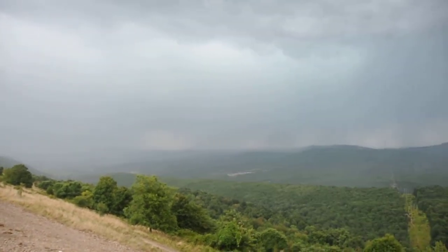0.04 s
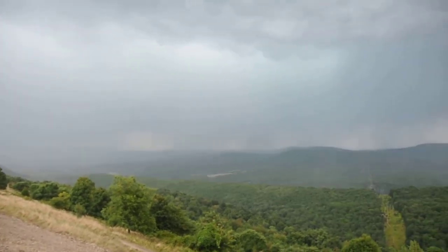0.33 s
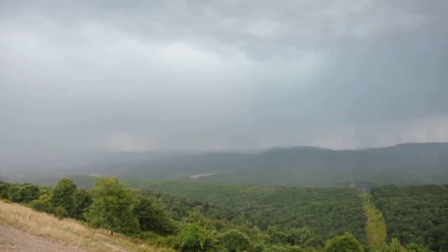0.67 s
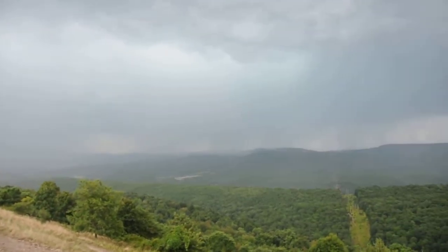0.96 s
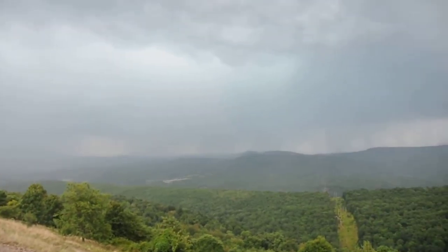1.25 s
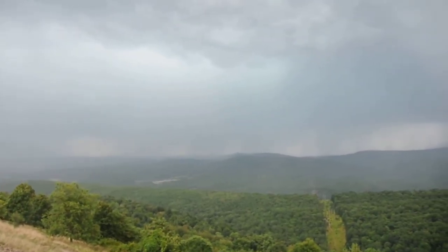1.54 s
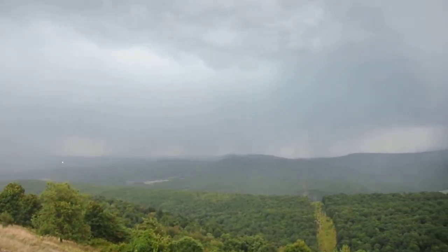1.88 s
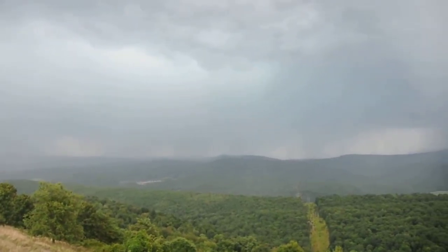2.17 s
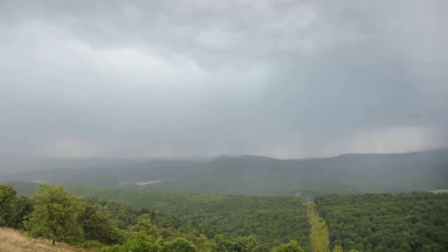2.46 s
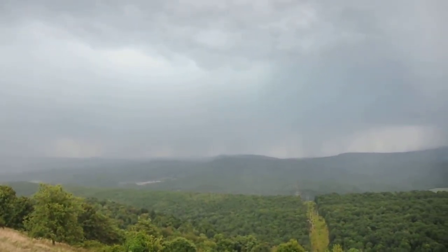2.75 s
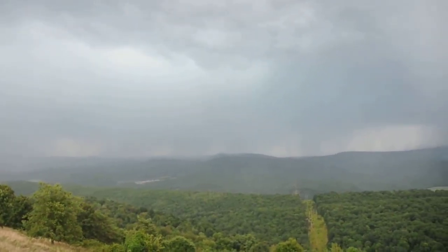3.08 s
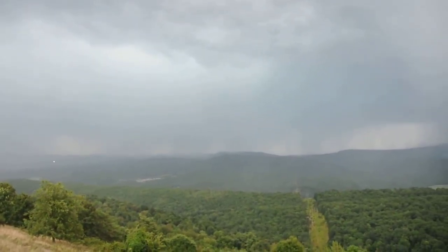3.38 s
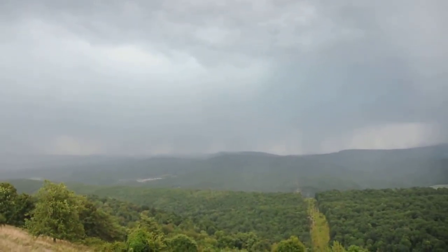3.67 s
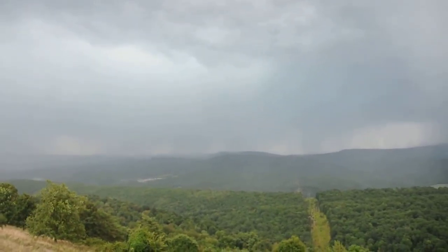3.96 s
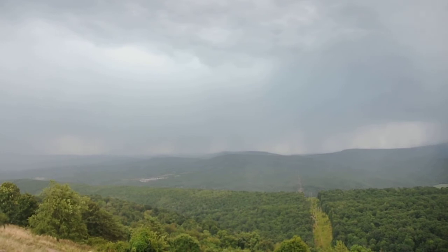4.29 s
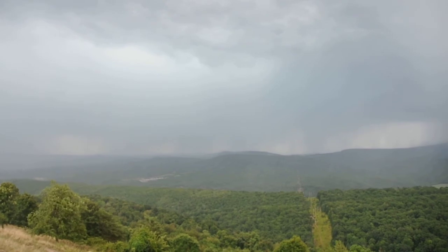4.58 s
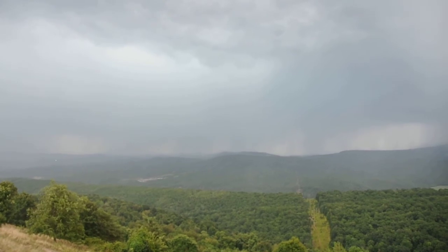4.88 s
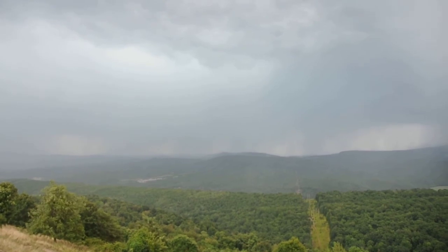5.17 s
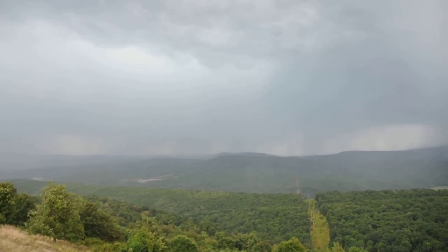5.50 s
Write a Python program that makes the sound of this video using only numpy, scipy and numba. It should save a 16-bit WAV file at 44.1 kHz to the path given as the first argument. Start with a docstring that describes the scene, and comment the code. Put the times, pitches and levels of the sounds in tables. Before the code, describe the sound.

Gusty wind rumbles and thumps against the microphone outdoors, with a faint hiss of trees and one small handling click.

```python
"""A hillside above a wooded valley, where storm wind buffets the microphone of a hand-held camera.
Turbulence rumbles at the port and single eddies thump it into overload; trees and dry grass hiss behind.
The hand ticks, rubs and clicks on the case, and the gain control ducks after the hardest blows."""
import sys
import numpy as np
from scipy import signal
from scipy.fft import rfft, irfft
from scipy.io import wavfile
from scipy.ndimage import uniform_filter1d
from numba import njit

SR = 44100
rng = np.random.default_rng(int(sys.argv[2]) if len(sys.argv) > 2 else 0)


def transcribe(u):
    """Save the signal u as a 16-bit wav file named by the first command-line argument.

    u: samples, shape (n,) or (channels, n), limited to [-1, 1]; the rate is SR.
    q: integer samples, one column per channel.
    """
    v = np.clip(np.atleast_2d(u).T, -1, 1)
    q = np.round(v * 32767).astype(np.int16)
    wavfile.write(sys.argv[1], SR, q)


N = 243873

# colour of skin rubbing on the case, and of the case's rattle: f/Hz, level/dB
SKIN_COLOUR = [(500, 1), (1200, -3.5), (2200, -0.5), (3000, -4.5), (4000, -12), (5200, -29)]


def undb(db):
    """Decibels to gain."""
    return 10 ** (np.asarray(db) / 20)


def unit(x):
    """Scale to rms 1."""
    return x / np.sqrt(np.mean(x ** 2))


def seconds():
    """Time of every sample."""
    return np.arange(N) / SR


def curves(table):
    """Automation lanes: each column after the time, joined by straight lines."""
    times, *columns = np.transpose(table)
    return [np.interp(seconds(), times, column) for column in columns]


def noise(colour):
    """Noise of the given colour, rolled off beyond its ends, rms 1."""
    hz, db = np.transpose(colour)
    f = np.maximum(np.fft.rfftfreq(N, 1 / SR), 1)
    gain = undb(np.interp(np.log(f), np.log(hz), db))
    rolloff = np.minimum(f / hz[0], 1) * np.minimum(hz[-1] / f, 1) ** 2
    return unit(irfft(rfft(rng.standard_normal(N)) * gain * rolloff, N))


def wobble(depth_db, rate_hz):
    """Smooth random gain that wanders by depth_db rms."""
    f = np.fft.rfftfreq(N, 1 / SR)
    drift = unit(irfft(rfft(rng.standard_normal(N)) * np.exp(-(f / rate_hz) ** 2), N))
    return undb(depth_db * drift)


def even_out(x, span_s):
    """Ride out the swells of a noise that are slower than span_s."""
    size = max(int(span_s * SR), 2)
    power = uniform_filter1d(uniform_filter1d(x ** 2, size), size)
    return x / np.sqrt(power + 1e-9)


def lowpass(x, hz):
    """Steep high cut."""
    return signal.sosfilt(signal.ellip(8, .2, 70, hz, fs=SR, output="sos"), x)


def airflow(bed_trim_db=1.5, calm_buffet_db=-12.5):
    """Level lanes in dB for rumble and buffeting: bell-shaped gusts ride on a bed of steady wind."""
    # steady airflow at the port: t/s, rumble/dB before trim
    bed = [(0.0, -31), (0.48, -31), (1.28, -19), (2.08, -20), (2.23, -24), (2.77, -18.5), (3.14, -28.5),
           (3.56, -24.5), (3.73, -31.5), (4.22, -26), (4.4, -30.5), (4.74, -29), (5.16, -37.5),
           (5.53, -28.5)]
    # gusts puffing on the port: t/s at the crest, length/s, rumble/dB, buffeting/dB
    gusts = [(0.058, 0.062, -19, -28.5), (0.277, 0.029, -32, -33), (0.406, 0.012, -14, -42.5),
             (0.744, 0.084, -17, -33), (0.874, 0.052, -12.5, -19), (1.101, 0.061, -13.5, -23.5),
             (1.243, .11, -14, -23), (1.44, 0.37, -17.5, -30.5), (1.671, 0.072, -18, -20),
             (1.88, 0.13, -11.5, -27), (2.011, 0.044, -12, -13), (2.26, .15, -27, -20),
             (2.65, 0.045, -27, -23.5), (2.733, 0.062, -13, -14), (2.875, 0.06, -6.5, -12.5),
             (3.102, 0.13, -26, -30.5), (3.407, 0.13, -20.5, -22), (3.525, 0.045, -26.5, -16),
             (3.648, 0.11, -15, -18.5), (3.99, 0.18, -21, -27.5), (4.137, 0.021, -15.5, -21),
             (4.322, .09, -18, -24), (4.654, 0.077, -21.5, -37), (4.748, 0.053, -13.5, -19.5),
             (4.878, 0.065, -23.5, -25), (5.152, .1, -24, -36)]
    bed_db = curves(bed)[0] + bed_trim_db
    rumble_power = undb(bed_db) ** 2
    buffet_power = undb(bed_db + calm_buffet_db) ** 2
    t = seconds()
    for crest, length, rumble_db, buffet_db in gusts:
        near = np.abs(t - crest) < 2 * length
        swell = np.exp(-2 * (2 * (t[near] - crest) / length) ** 2 * np.log(2))
        rumble_power[near] += swell * undb(rumble_db) ** 2
        buffet_power[near] += swell * undb(buffet_db) ** 2
    return 10 * np.log10(rumble_power), 10 * np.log10(buffet_power)


def turbulence(rumble_db, buffet_db, rumble_trim_db=-1, buffet_trim_db=2.5):
    """Large swirls rumble and flutter; the small ones they carry buffet in quick patches."""
    # low end of the large swirls: f/Hz, level/dB
    rumble_colour = [(12, -21), (25, -4), (50, 3), (88, 2.5), (130, -0.5), (190, -7.5), (280, -35),
                     (500, -47)]
    # low mids of the small swirls: f/Hz, level/dB
    buffet_colour = [(90, -20), (160, -2), (230, 1.5), (310, -6.5), (400, -8), (550, -15), (750, -26.5),
                     (1000, -28.5), (1600, -48), (3000, -73.5)]
    flutter = wobble(depth_db=2, rate_hz=56)
    rumble = even_out(noise(rumble_colour) * flutter, span_s=0.21)
    patches = noise(buffet_colour) * flutter * wobble(depth_db=4, rate_hz=91)
    buffet = even_out(patches, span_s=0.089)
    return rumble * undb(rumble_db + rumble_trim_db) + buffet * undb(buffet_db + buffet_trim_db)


def foliage():
    """Countless leaves and grass blades blur into a soft hiss that swells and flickers in the wind."""
    # wind over the hillside: t/s, trees/dB, grass/dB
    swells = [(0, -49, -55.5), (.65, -47.5, -56), (.85, -42.5, -58), (1.25, -40, -53), (1.6, -43, -54.5),
              (2.0, -42, -56.5), (2.5, -41.5, -53.5), (2.85, -43, -54), (3.1, -48, -56.5),
              (3.35, -42, -53.5), (3.6, -46.5, -55), (4.0, -42.5, -52), (4.4, -48.5, -53),
              (5.0, -49.5, -53.5), (5.53, -47.5, -51.5)]
    # soft wash of the trees: f/Hz, level/dB
    tree_colour = [(200, -14), (600, 3), (1100, 3.5), (1700, 0), (2600, -7), (3500, -14), (5200, -38.5)]
    # brighter hiss of dry grass: f/Hz, level/dB
    grass_colour = [(1000, -5.5), (2200, 4.5), (3100, 1.5), (4000, -1.5), (4700, -6), (5300, -22)]
    trees_db, grass_db = curves(swells)
    trees = noise(tree_colour) * undb(trees_db)
    grass = noise(grass_colour) * undb(grass_db)
    return (trees + grass) * wobble(depth_db=1.23, rate_hz=50)


def add_eddy(out, at_s, gain, hz, core=12):
    """One eddy swings the diaphragm one way, then the other; hz is its speed over its size."""
    start, end = int((at_s - 2 / hz) * SR), int((at_s + 2 / hz) * SR)
    near = np.arange(max(start, 0), min(end, N))
    phase = 2 * np.pi * hz * (near / SR - at_s)
    taper = ((core + 1) / (core + phase ** 2)) ** ((core + 1) / 2)
    out[near] += gain * phase * taper


def stray_eddies(buffet_db, count=110, lift_db=7, scatter_db=1, typical_hz=287, scatter_octaves=0.22):
    """Lesser eddies patter at random, as strong as the air that carries them."""
    out = np.zeros(N)
    arrivals = rng.integers(0, N, count)
    for i, (weakness, pitch, spin) in zip(arrivals, rng.standard_normal((count, 3))):
        gain = np.sign(spin) * undb(buffet_db[i] + lift_db - scatter_db * weakness)
        add_eddy(out, i / SR, gain, typical_hz * 2 ** (scatter_octaves * pitch))
    return out


def hard_eddies(trim_db=-3, wake_db=-3.5, wake_fall_db=-18, wake_spread=1.15, wake_count=5):
    """Each hard eddy thumps and trails weaker ones, close at first and then at wider, uneven gaps."""
    # hardest eddies to hit the port: t/s, peak/dB before trim, f/Hz (speed over size), wake length/s
    hits = [(0.408, -18.5, 188, 0.0055), (0.74, -8.5, 260, 0.0079), (.873, 7.5, 509, 0.0046),
            (1.232, -0.5, 514, .018), (1.538, -9, 350, 0.0081), (1.609, -7.5, 277, 0.0041),
            (1.667, -3.5, 530, 0.023), (1.825, -15, 450, 0.007), (1.849, 5, 570, 0.015),
            (1.884, -9.5, 470, 0.0031), (1.992, -16, 386, 0.0058), (2.005, 4.5, 684, 0.017),
            (2.187, -9.5, 400, 0.0078), (2.263, -3.5, 740, 0.01026), (2.306, -9.5, 468, 0.0052),
            (2.336, -11.5, 504, 0.0087), (2.507, -10.5, 318, 0.0062), (2.712, -13, 300, 0.0048),
            (2.724, 3.5, 350, .03), (2.842, -2.5, 820, 0.0019), (2.878, 0, 390, 0.02),
            (3.007, -11.5, 400, 0.0083), (3.373, -7, 371, 0.01), (3.44, -3.5, 236, 0.0061),
            (3.526, -11, 370, 0.0059), (3.676, -6.5, 767, 0.0029), (4.001, -7, 286, 0.0042),
            (4.344, -8.5, 275, 0.0036), (4.765, -6, 320, 0.0095), (4.877, -8.5, 326, 0.0056)]
    out = np.zeros(N)
    for at_s, db, hz, wake_s in hits:
        add_eddy(out, at_s, undb(db + trim_db), hz)
        for k, (jitter, spin) in enumerate(rng.uniform(-1, 1, (wake_count, 2))):
            delay_s = wake_s * ((k + 1 + jitter / 2) / wake_count) ** wake_spread
            gain = np.sign(spin) * undb(db + trim_db + wake_db + wake_fall_db * k / wake_count)
            add_eddy(out, at_s + delay_s, gain, hz)
    return out


def port(blows, hz=780, width_hz=400, ring_db=-11):
    """The cavity behind the microphone hole rings briefly after each blow."""
    ring = signal.lfilter(*signal.iirpeak(hz, hz / width_hz, fs=SR), blows)
    return blows + undb(ring_db) * ring


def strokes(contacts, colour, grain_db):
    """Friction on the case: grainy noise under a short, rounded fade for each contact."""
    t = seconds()
    touch = sum(undb(db) * np.cos(np.pi * np.clip((t - middle) / length, -.5, .5))
                for middle, length, db in contacts)
    friction = unit(noise(colour) * wobble(grain_db, rate_hz=100))
    return touch * friction


def grip():
    """The shifting grip ticks lightly on the case, and sliding skin rustles."""
    # light ticks of the grip: t/s at the middle, length/s, level/dB
    ticks = [(1.4385, 0.0074, -35.5), (2.421, 0.014, -39.5)]
    # bright edge of a fingernail: f/Hz, level/dB
    nail_colour = [(1800, -10), (2900, 14), (4000, 3.5), (5200, -20)]
    # fingers sliding: t/s at the middle, length/s, level/dB
    slides = [(2.698, 0.32, -39.5), (2.873, 0.11, -34), (3.765, 0.19, -39), (3.942, 0.077, -37.5)]
    return strokes(slides, SKIN_COLOUR, grain_db=5) + strokes(ticks, nail_colour, grain_db=2.5)


def case_clicks(rattle_db=-24, rattle_t60_s=0.082, attack_s=0.0017):
    """The plastic case snaps, rings briefly and leaves a faint rattle."""
    # snaps under the grip: t/s, strength/dB
    snaps = [(3.8926, -5.5), (3.9028, -28)]
    # modes of the case: f/Hz, relative level/dB, t60/s
    modes = [(880, -9, 0.028), (2040, 1, 0.0089), (2240, 10.5, 0.0063), (2390, -3, 0.013),
             (2680, 10, 0.006), (3340, -22, 0.0067)]
    out = np.zeros(N)
    for at_s, db in snaps:
        age = np.maximum(seconds() - at_s, 0)
        ring = sum(undb(mode_db) * np.sin(2 * np.pi * hz * age) * undb(-60 * age / t60)
                   for hz, mode_db, t60 in modes)
        rattle = noise(SKIN_COLOUR) * undb(-60 * age / rattle_t60_s)
        attack = 1 - np.exp(-age / attack_s)
        out += undb(db) * attack * (ring + undb(rattle_db) * rattle)
    return out


@njit
def follow(level, attack, release):
    """Envelope follower with separate rates for rising and sinking."""
    out, envelope = np.empty(len(level)), 0.
    for i in range(len(level)):
        envelope += (level[i] - envelope) * (attack if level[i] > envelope else release)
        out[i] = envelope
    return out


def scene():
    """Mono mix: wind at the port up front, over the dulled hillside hiss and handling noise."""
    rumble_db, buffet_db = airflow()
    wind = turbulence(rumble_db, buffet_db)
    thumps = port(hard_eddies() + stray_eddies(buffet_db))
    backdrop = lowpass(foliage() + grip() + case_clicks(), hz=5250)
    return (wind + thumps + backdrop)[None]


def record(dry, threshold_db=-5.5, attack_s=0.009, release_s=0.54, ceiling=.72, hardness=22, dull_hz=6500):
    """Gain control ducks after hard blows; faster peaks overload the input with a dull crack."""
    envelope = follow(np.abs(dry[0]), 1 / (attack_s * SR), 1 / (release_s * SR))
    ducked = dry * np.minimum(undb(threshold_db) / (envelope + 1e-9), 1)
    clipped = ducked / (1 + np.abs(ducked / ceiling) ** hardness) ** (1 / hardness)
    dulled = signal.sosfilt(signal.butter(1, dull_hz, fs=SR, output="sos"), clipped)
    return lowpass(dulled, hz=15800)


dry = scene()
out = record(dry)
transcribe(out)
```